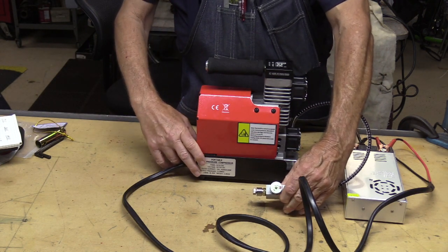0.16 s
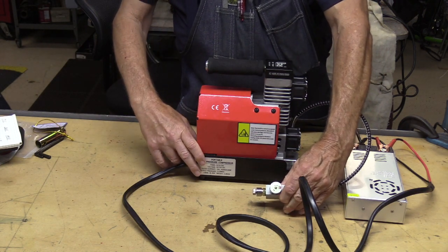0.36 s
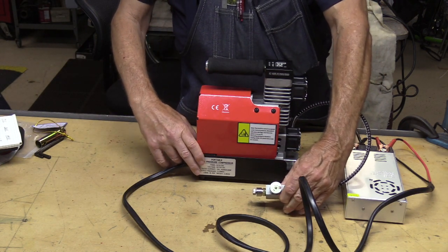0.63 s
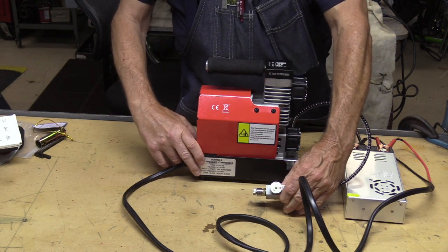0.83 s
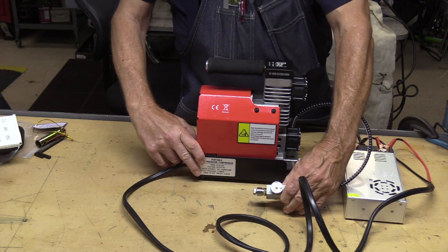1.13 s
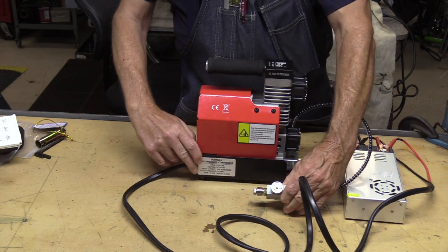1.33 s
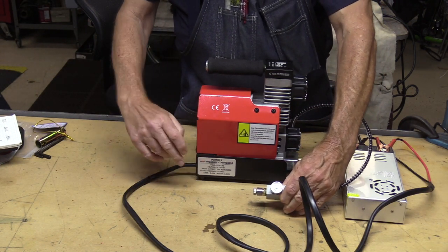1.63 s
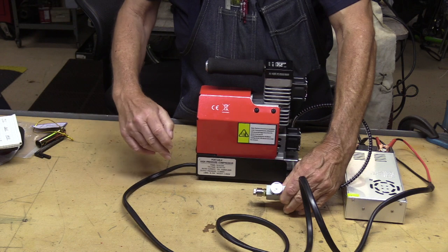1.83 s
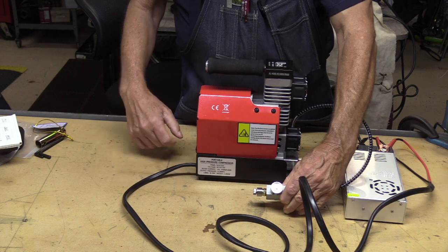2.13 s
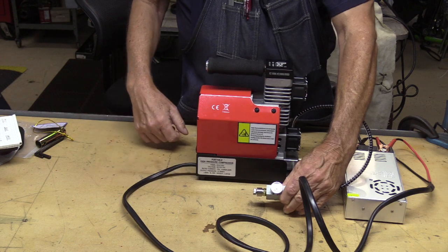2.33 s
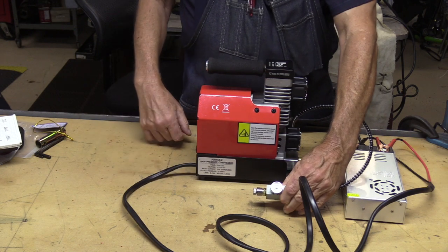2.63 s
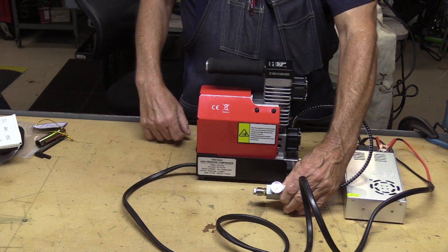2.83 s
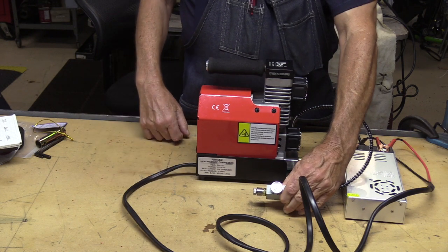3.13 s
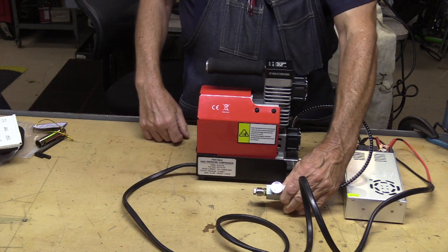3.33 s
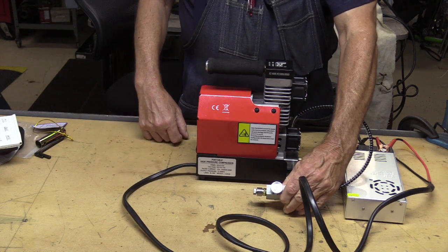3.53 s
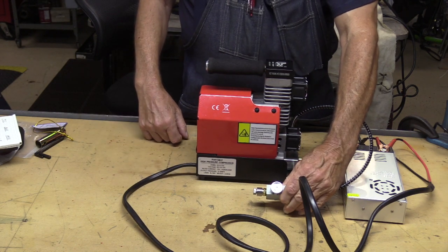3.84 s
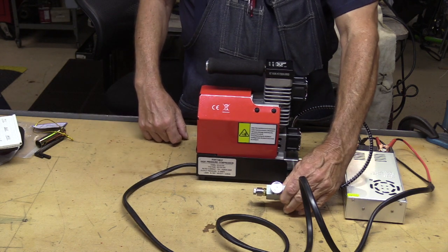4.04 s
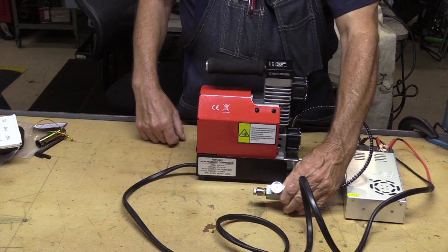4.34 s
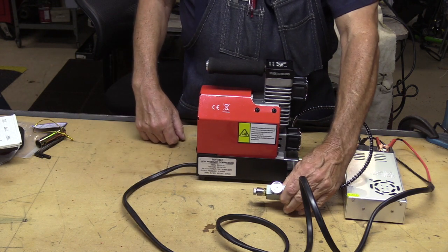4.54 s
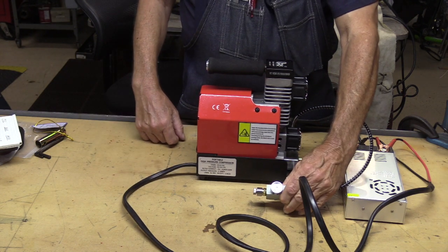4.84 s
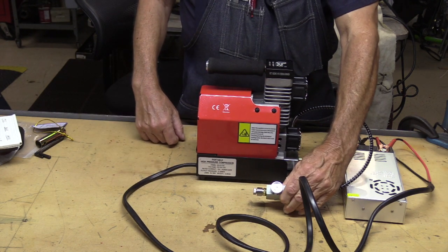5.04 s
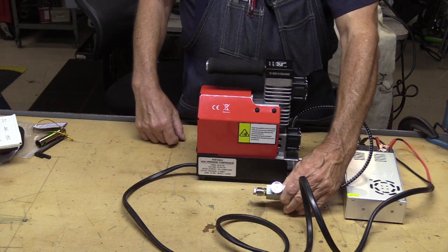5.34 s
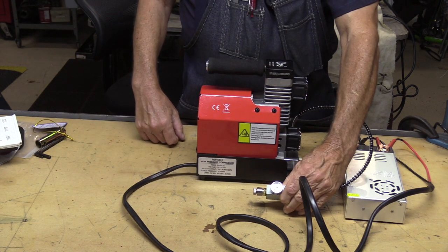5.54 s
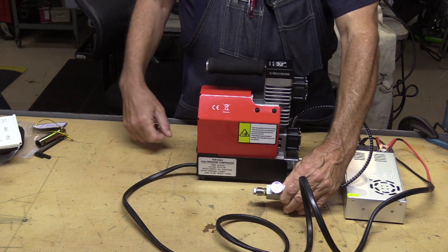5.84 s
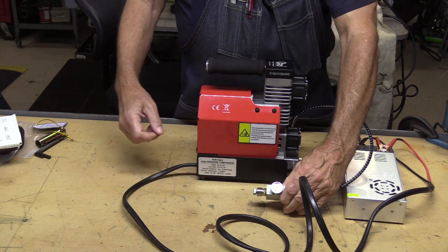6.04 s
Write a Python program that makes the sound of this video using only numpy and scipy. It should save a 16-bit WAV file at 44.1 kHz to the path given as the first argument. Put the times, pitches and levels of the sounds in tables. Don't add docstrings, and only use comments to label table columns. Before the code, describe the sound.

From 0 to 1 s only small cooling fans are heard: two strong, close whines around 1.7 and 1.85 kHz, a thinner whistle near 5 kHz, a faint lower hum and broad rushing air, trembling slightly with a short falter near 0.7 s. At about 1.05 s a piston air compressor switches on with a tap and motor rumble; the fan tones sag quickly by about a semitone, then mostly recover by 2 to 3 s. From 1.1 to 3 s the strokes are uneven, with loose valve taps, fluttering reed and light thuds. From 3.1 to 6.2 s they become stronger and regular, just over six per second: flutter, thud with airy puff, brief metallic head ring, hard crank knock and rattle. The motor labours with each stroke. The fans whine throughout. Damped workshop, very short tail, mono camera microphone one or two metres away; it ends still running.

```python
import sys
import numpy as np
from scipy import signal
from scipy.fft import rfft, irfft
from scipy.io import wavfile
from scipy.ndimage import uniform_filter1d

SR = 44100
rng = np.random.default_rng(int(sys.argv[2]) if len(sys.argv) > 2 else 0)


def int16_out(signal):
    q = np.round(np.clip(np.atleast_2d(signal).T, -1, 1) * 32767)
    wavfile.write(sys.argv[1], SR, q.astype(np.int16))


def voltage_ratio(level):
    return 10 ** (np.asarray(level, float) / 20)


N = 272570
TIME = np.arange(N) / SR


def curve(table, column=1):
    rows = np.array(table)
    return np.interp(TIME, rows[:, 0], rows[:, column])


def dips(table, width_s):
    return sum(db * np.exp(-((TIME - s) / width_s) ** 2) for s, db in table)


def unit(x):
    return x / np.sqrt(np.mean(x ** 2))


def band(x, hz, width_hz):
    b, a = signal.iirpeak(min(hz, .45 * SR), hz / width_hz, fs=SR)
    return signal.lfilter(b, a, x)


def hiss(hz, width_hz):
    once = band(rng.standard_normal(N), hz, width_hz)
    return unit(band(once, hz, width_hz))


def walk(rate_hz):
    k = int(SR / rate_hz)
    once = uniform_filter1d(rng.standard_normal(N), k)
    return unit(uniform_filter1d(once, k))


def tone(hz, wobble, flicker_db, rate_hz):
    phase = 2 * np.pi * np.cumsum(hz * (1 + wobble * walk(rate_hz))) / SR
    return np.sqrt(2) * np.sin(phase) * voltage_ratio(flicker_db * walk(rate_hz))


def place(start_s, level_db, shape):
    train = np.zeros(N)
    index = np.clip((np.asarray(start_s) * SR).astype(int), 0, N - 1)
    np.add.at(train, index, voltage_ratio(level_db))
    return signal.oaconvolve(train, shape)[:N]


def swell(rise_s, fall_s):
    t = np.arange(SR // 8) / SR
    shape = (1 - np.exp(-t / rise_s)) ** 2 * np.exp(-t / fall_s)
    return shape / shape.max()


def knock(hz, fall_s):
    t = np.arange(SR // 8) / SR
    ring = np.sin(2 * np.pi * hz * t) * swell(0.46 / hz, fall_s)
    return signal.sosfilt(signal.butter(2, hz / 3, "high", fs=SR, output="sos"), ring)


FAN_WANDER_DB = .6

# start_s, pitch_hz
FAN_A_PITCH = [(0, 1849.5), (1.045, 1848), (1.075, 1780), (1.14, 1755), (1.22, 1772), (1.32, 1795),
               (1.5, 1807), (1.89, 1808.5), (2.41, 1818), (2.85, 1825), (3.25, 1821), (3.7, 1824.5),
               (4.15, 1821), (4.5, 1824), (6.18, 1824.3)]
# start_s, level_db
FAN_A_LEVEL = [(0, -18.5), (.6, -17.8), (1.0, -18), (1.2, -17), (1.41, -19), (1.8, -16), (2.5, -16),
               (3.8, -20), (4.6, -15.5), (5.3, -16), (6.18, -17.5)]
# blade_multiple, level_db (against the first)
FAN_A_OVERTONES = [(2, -24), (3, -30)]
# centre_s, level_db
FAN_A_DROPOUTS = [
    (.69, -14),
    (1.66, -10),
    (2.6, -6.5),
    (6.17, -4),
]


def fan_a():
    hz = curve(FAN_A_PITCH)
    whine = tone(hz, 0.00041, 0.95, 15.3)
    for multiple, db in FAN_A_OVERTONES:
        whine = whine + voltage_ratio(db) * tone(multiple * hz, 0.000554, 2.1, 22)
    level_db = curve(FAN_A_LEVEL) + dips(FAN_A_DROPOUTS, .031) + FAN_WANDER_DB * walk(4.2)
    return voltage_ratio(level_db) * whine


# start_s, pitch_hz
FAN_B_PITCH = [(0, 1683.5), (.8, 1686.5), (1.04, 1683), (1.075, 1618), (1.14, 1592), (1.27, 1624),
               (1.5, 1637.5), (1.82, 1641.5), (2.33, 1631), (2.67, 1643), (2.95, 1647.3), (3.19, 1644.6),
               (3.47, 1646.6), (4.03, 1638), (4.36, 1646), (4.65, 1643.5), (5.05, 1651), (6.18, 1652)]
# start_s, first_db, second_db, third_db
FAN_B_LEVELS = [(0, -23.5, -30.5, -23.5), (.25, -22.5, -28.5, -22.5), (.45, -36, -33, -22),
                (.65, -30, -31.5, -24), (1.03, -22, -30.5, -25), (1.13, -33, -30, -30),
                (1.3, -26, -31, -27), (1.55, -27, -33, -25), (2.12, -24.5, -33.5, -25),
                (2.2, -28, -35.5, -30.5), (2.67, -25, -33, -30), (2.93, -32, -38.5, -28),
                (3.3, -29, -31, -28), (3.62, -22, -34, -28.5), (3.72, -32, -32, -33),
                (4.2, -24, -31.5, -31.5), (4.4, -26.5, -30.5, -27), (6.18, -26, -29.5, -27.5)]
# blade_multiple, level_db (against the third)
FAN_B_OVERTONES = [(4, -29), (5, -27)]
# start_s, level_db
SHAFT_LEVEL = [(0, -38), (1.0, -38), (1.3, -35), (1.4, -39.5), (6.18, -45)]


def fan_b():
    hz = curve(FAN_B_PITCH)
    whine = 0
    for k in range(1, 4):
        level_db = curve(FAN_B_LEVELS, column=k) + FAN_WANDER_DB * walk(6)
        whine = whine + voltage_ratio(level_db) * tone(k * hz, 0.000562, 1.33, 32.3)
    for k, db in FAN_B_OVERTONES:
        level_db = curve(FAN_B_LEVELS, column=3) + db
        whine = whine + voltage_ratio(level_db) * tone(k * hz, 0.000516, 6.8, 8.1)
    turn = tone(hz / 5, 0.0016, 1.2, 13)
    shaft = voltage_ratio(curve(SHAFT_LEVEL)) * (turn + voltage_ratio(-10) * hiss(322, 73))
    return voltage_ratio(0.13) * whine + shaft


# start_s, pitch_hz
SUPPLY_PITCH = [(0, 867), (1.04, 867), (1.12, 845), (1.4, 853), (1.7, 862), (2.1, 866), (6.18, 867.5)]
# start_s, level_db
SUPPLY_LEVEL = [(0, -40), (1.0, -39), (1.1, -33), (1.5, -33), (2.5, -35), (3.0, -38), (3.7, -35),
                (5.0, -35), (6.18, -31)]


def supply_fan():
    return voltage_ratio(curve(SUPPLY_LEVEL)) * tone(curve(SUPPLY_PITCH), 0.00039, 1.5, 3.1)


# pitch_hz, density_db (per Hz)
RUSH_SPECTRUM = [(15, -79), (25, -33), (306, -21), (330, -8.5), (450, -15), (1080, -5), (1230, -10.5),
                 (1820, 0), (1960, -9), (3200, -14.5), (4720, -17), (5230, -13.5), (5800, -23),
                 (12000, -24.5), (15500, -93), (22000, -120)]
# pitch_hz, width_hz, level_db
HOUSINGS = [(706, 105, -9), (1119, 140, -3.5), (1248, 110, -3), (1722, 140, 1.5), (1839, 270, 1.5),
            (2247, 430, -1.5), (5030, 1900, -6), (6010, 880, -8.5)]


def fan_air():
    hz, db = np.transpose(RUSH_SPECTRUM)
    grid_hz = np.maximum(np.arange(N // 2 + 1) * SR / N, 1)
    tilt = voltage_ratio(np.interp(np.log(grid_hz), np.log(hz), db))
    rush = unit(irfft(rfft(rng.standard_normal(N)) * tilt, N))
    housings = sum(voltage_ratio(db + 1.1 * walk(7)) * hiss(f, w) for f, w, db in HOUSINGS)
    gust_db = .5 * walk(16.2)
    return voltage_ratio(-25.5 + gust_db) * (voltage_ratio(9) * rush + housings)


# centre_s, level_db
FLOW_LULLS = [
    (.7, -2),
    (.86, -1.5),
    (1.38, -3.5),
    (1.69, -1),
    (2.57, -2.5),
    (2.9, -3),
    (4.46, -3),
    (4.74, -2),
    (6.16, -2.5),
]


def fans():
    lull_db = dips(FLOW_LULLS, .028)
    return voltage_ratio(lull_db) * (fan_a() + fan_air()) + fan_b() + supply_fan()


def load():
    s = np.array([row[0] for row in FIRST_STROKES + LOADED_STROKES])
    lead_s = .055
    return place(s - lead_s, 0 * s, np.hanning(int(.11 * SR))) - .35


# start_s, level_db
MOTOR_LEVEL = [(1.03, -78), (1.06, -34), (1.3, -31), (2.0, -31.5), (3.0, -33), (4.5, -31), (6.18, -31)]
# pitch_hz, width_hz, level_db
BENCH_RESONANCES = [(28, 20, -20.5), (66, 40, -16.5), (139, 58, -13.5), (247, 98, -13.5), (414, 77, -1.5),
                    (580, 55, -3), (690, 45, -6), (1310, 630, -12), (4510, 170, -11)]


def motor():
    rumble = sum(voltage_ratio(db + 2.7 * walk(18)) * hiss(f, w) for f, w, db in BENCH_RESONANCES)
    labour_db = 5.0 * load()
    return voltage_ratio(curve(MOTOR_LEVEL)) * rumble * voltage_ratio(labour_db)


SCATTER_DB = 0.4

# start_s, level_db
LOOSE_TAPS = [(1.048, -26), (1.197, -20), (1.292, -23), (1.378, -21), (1.527, -17), (1.592, -25),
              (1.682, -20), (1.737, -22), (1.826, -21), (1.98, -24), (2.164, -25), (2.316, -22),
              (2.476, -19), (2.627, -24), (2.799, -23.5), (2.954, -26), (2.983, -25)]
# peak_s, level_db
LOOSE_FLUTTERS = [(1.054, -32), (1.27, -34), (1.403, -32), (1.544, -31), (1.691, -27.5), (1.919, -28),
                  (2.0, -27), (2.051, -30), (2.19, -25), (2.337, -24.5), (2.49, -27), (2.524, -27),
                  (2.64, -26), (2.678, -23), (2.796, -28), (2.964, -33)]


def inlet():
    stroke_s, *_, inlet_db = np.transpose(LOADED_STROKES)

    soft_db = -34 + 3.5 * rng.standard_normal(len(stroke_s))
    s, db = np.hstack([np.transpose(LOOSE_TAPS), [stroke_s - .0465, soft_db]])
    tap = -knock(335, 0.00044) - voltage_ratio(-3.0) * knock(760, 0.00083)
    taps = place(s - .002, db + 12.5, tap)

    s, reed_db = np.hstack([np.transpose(LOOSE_FLUTTERS), [stroke_s - .0229, inlet_db]])
    open_s, peak = .048, .58
    t = np.arange(int(open_s * SR)) / SR
    opening = np.interp(t / open_s, [0, .06, .25, peak, .8, 1], [0, .5, .55, 1, .75, 0])
    flutter = opening * np.sin(2 * np.pi * 410 * t)
    reed = place(s - peak * open_s, reed_db + 4.5, flutter)

    over_db = reed_db + 2 + SCATTER_DB * rng.standard_normal(len(s))
    choke_s = s - 1 / 8 + .015
    growth = place(choke_s, over_db + 3.0, swell(0.002, 0.015)[::-1])
    overtone = growth * tone(1235, 0.00835, 1.0, 94.3)
    return taps + reed + overtone


# start_s, outlet_db, crank_db, puff_db
FIRST_STROKES = [(1.144, -26, -21, -30), (1.244, -21.5, -17, -27), (1.42, -31, -25.3, -28.5),
                 (1.567, -24.5, -19, -28.5), (1.712, -27, -18, -29), (1.867, -26, -18, -25.5),
                 (2.02, -27, -15.5, -27.5), (2.179, -31, -16, -35), (2.362, -20.5, -15.5, -28),
                 (2.52, -29, -22.3, -33), (2.671, -24, -17, -29), (2.83, -28, -32, -34),
                 (2.966, -36, -21.3, -35)]
# start_s, outlet_db, crank_db, puff_db, inlet_db
LOADED_STROKES = [(3.1113, -21.5, -11.5, -27.5, -24.5), (3.2677, -24, -12, -27, -27.5),
                  (3.424, -21.5, -13, -27.5, -23.5), (3.5798, -22.3, -13, -28.5, -25),
                  (3.7363, -23.5, -12, -28, -24.8), (3.892, -22.5, -14.5, -27.5, -22.5),
                  (4.0481, -22, -15.5, -27.5, -22.5), (4.2038, -23, -15, -27, -22),
                  (4.3593, -22, -15, -26.5, -21.5), (4.5317, -20, -14.5, -27, -22),
                  (4.6882, -20, -13.5, -28, -22.8), (4.8462, -22.5, -15, -28, -22),
                  (5.0017, -20, -14, -28, -20), (5.1564, -23, -17.5, -29, -23),
                  (5.2947, -22, -12, -29, -21), (5.4502, -23, -15.7, -27.5, -21),
                  (5.6058, -21.5, -17, -30, -22), (5.7611, -22.5, -17.1, -29.5, -23.5),
                  (5.9245, -22.7, -13.6, -29, -22.5), (6.0791, -20.5, -14.5, -28, -21.5)]
# lag_s (after the thud), level_db (against the knock)
CRANK_RATTLE = [
    (.0105, -10),
    (.0145, -9.5),
    (.0318, -17),
]


def strokes():
    rows = FIRST_STROKES + [row[:4] for row in LOADED_STROKES]
    s, thud_db, knock_db, air_db = np.transpose(rows)
    puff_db = air_db + 1.1
    lower_db = air_db - 0.6 + SCATTER_DB * rng.standard_normal(len(s))
    ring_db = thud_db + 1.7 + SCATTER_DB * rng.standard_normal(len(s))

    thud = place(s - .0026, thud_db + 9, knock(262, 0.0015))
    jet = hiss(10500, 4100) + voltage_ratio(-6.5) * hiss(6000, 3500) + voltage_ratio(-7.5) * hiss(8200, 330)
    puff = place(s - .001, puff_db - .6, swell(0.0012, 0.037)) * jet
    lower_puff = place(s, lower_db + 6.0, swell(0.0011, 0.017)) * hiss(4670, 1660)

    head = tone(1260, 0.0052, 0.68, 104) + voltage_ratio(-1) * hiss(1100, 380)
    ring = place(s + .0095, ring_db + 1.0, swell(0.004, 0.024)) * head

    blow = knock(850, .0008)
    knock_s = s + .0268
    crank = place(knock_s, knock_db + 9.5, blow) + place(knock_s, knock_db + 2.5, knock(320, 0.0011))
    rattle = sum(place(s + lag, knock_db + 9.0 + db, blow) for lag, db in CRANK_RATTLE)
    rock = place(s + .032, thud_db - 17, knock(40, .012))
    return thud + puff + lower_puff + ring + crank + rattle + rock


def workshop(source):
    t60_s, first_echo_s = .16, .005
    t = np.arange(SR // 2) / SR
    tail = rng.standard_normal(len(t)) * np.exp(-np.log(1000) * t / t60_s) * (t > first_echo_s)
    return signal.fftconvolve(source, tail / np.sqrt(np.sum(tail ** 2)))[:N]


def scene():
    pump = inlet() + strokes()
    return (fans() + motor() + pump + voltage_ratio(-15) * workshop(pump))[None]


def roll_off(x):
    return signal.sosfilt(signal.butter(12, 12560, fs=SR, output="sos"), x)


def record(dry):
    sound = np.tanh(.85 * dry) / .85
    lowpass = signal.ellip(8, .05, 60, 12400, fs=SR, output="sos")
    sound = signal.sosfiltfilt(lowpass, sound)
    highpass = signal.ellip(10, .01, 70, 12000, "high", fs=SR, output="sos")
    top = signal.sosfiltfilt(highpass, sound)
    power = uniform_filter1d(top ** 2, size=900)
    gate_db = 2.7
    quiet = power < np.median(power) * voltage_ratio(2 * gate_db)
    muted = uniform_filter1d(1. * quiet, size=256)
    return roll_off(sound - top * muted)


dry = scene()
out = record(dry)
int16_out(out)
```